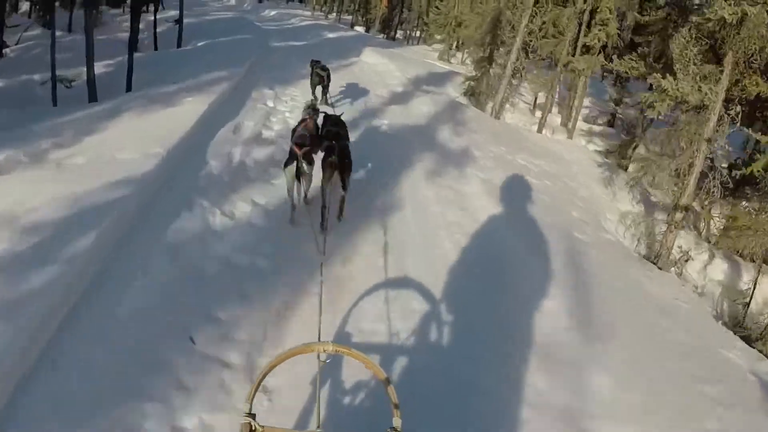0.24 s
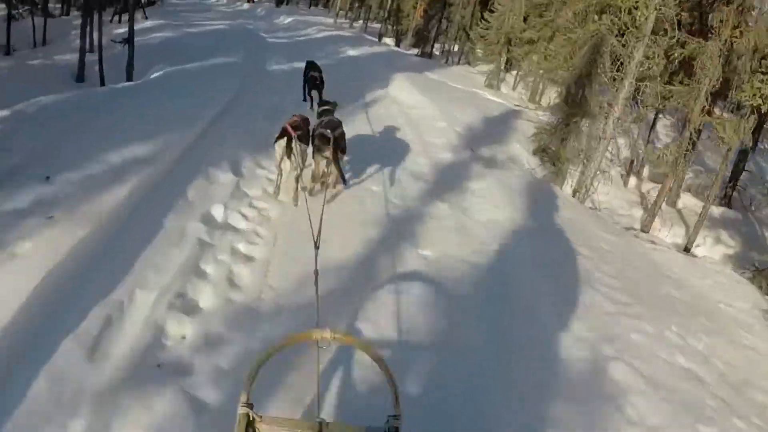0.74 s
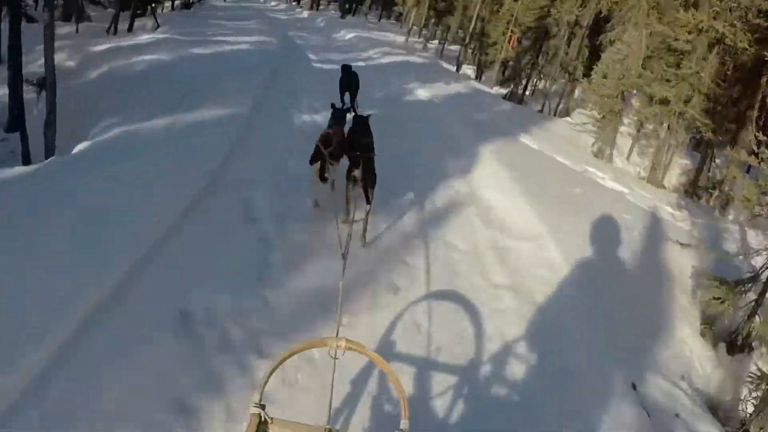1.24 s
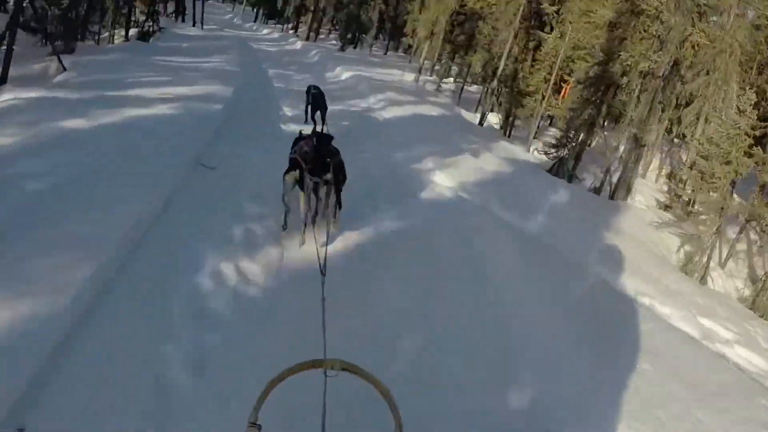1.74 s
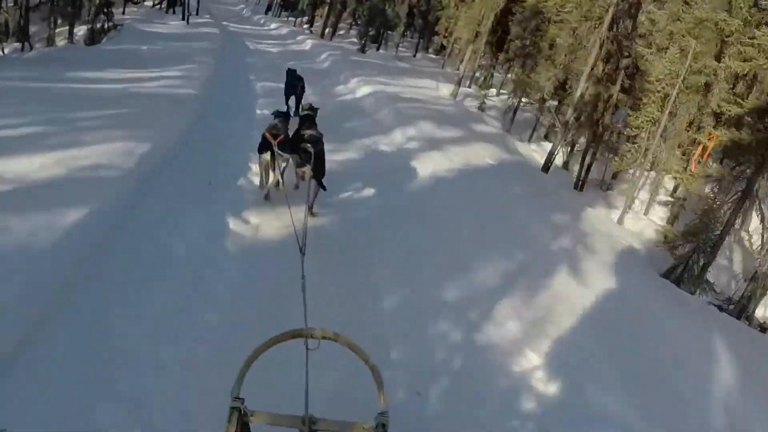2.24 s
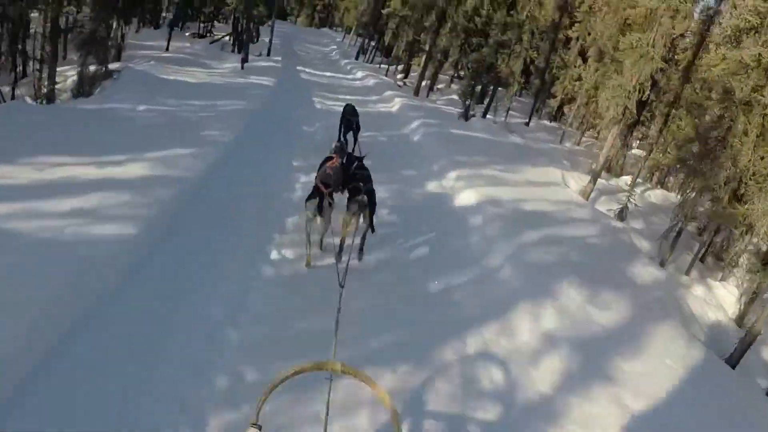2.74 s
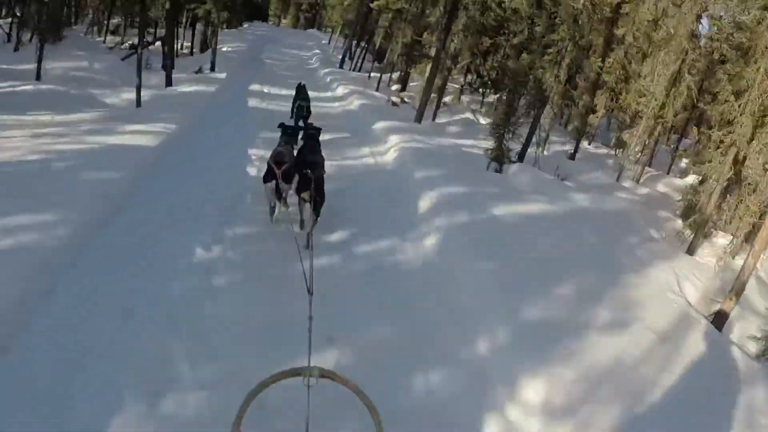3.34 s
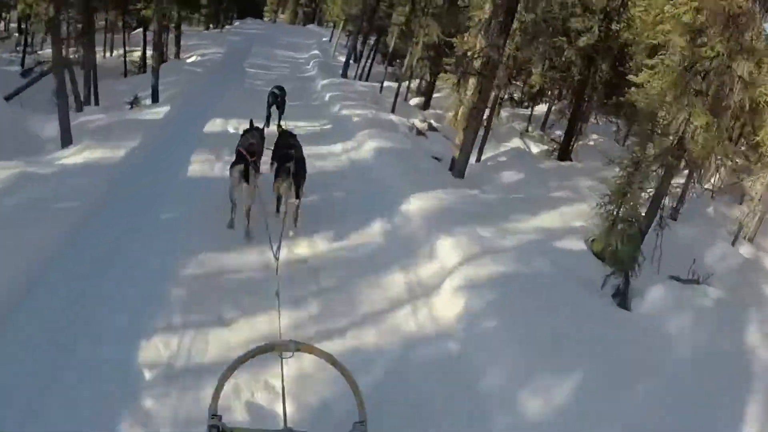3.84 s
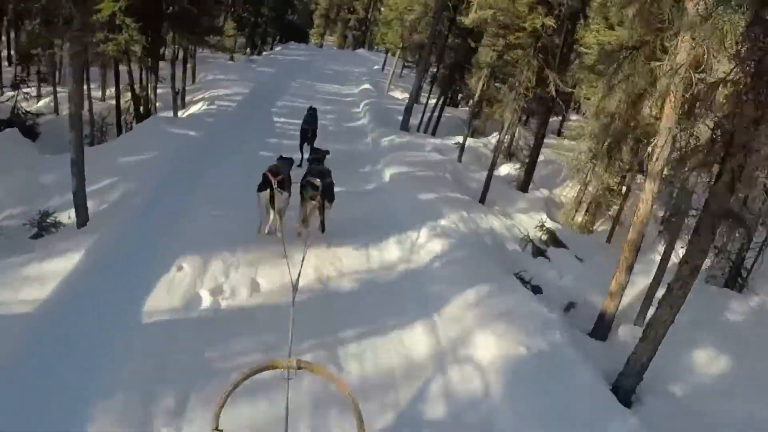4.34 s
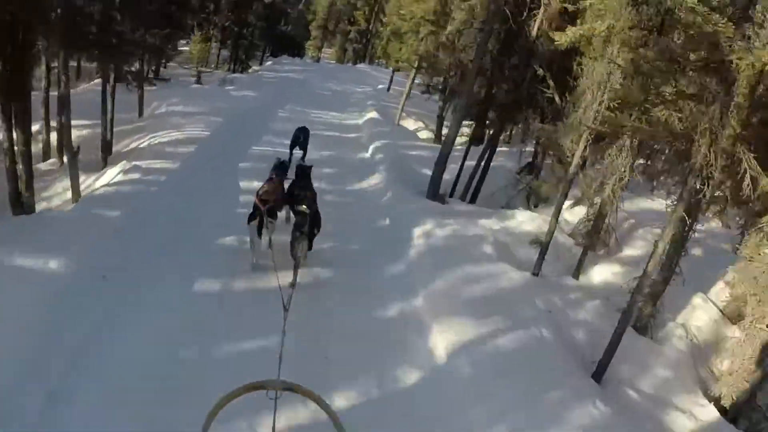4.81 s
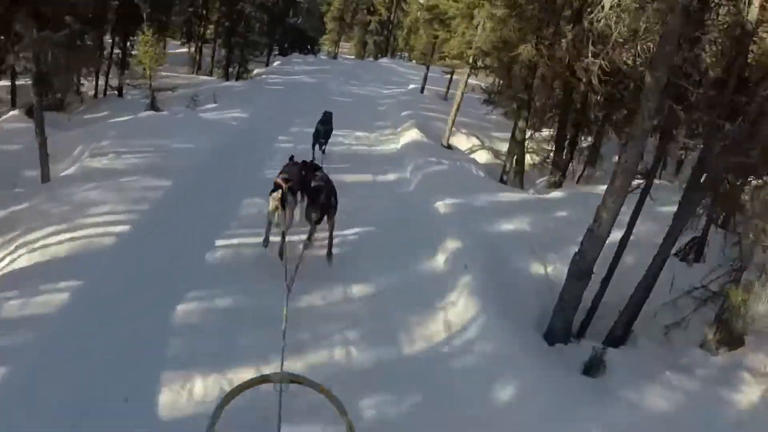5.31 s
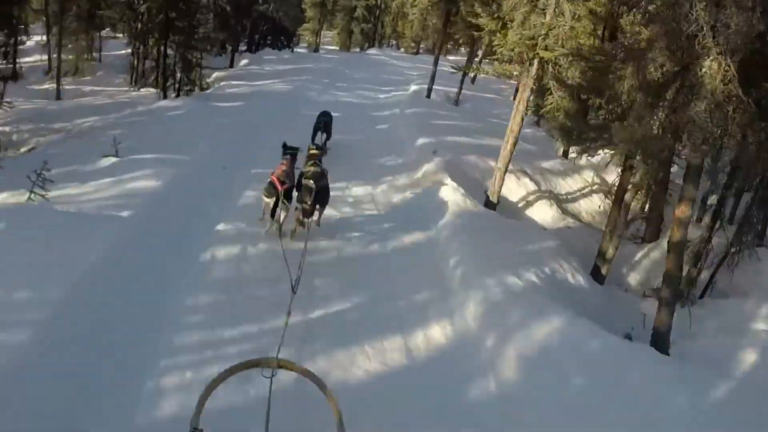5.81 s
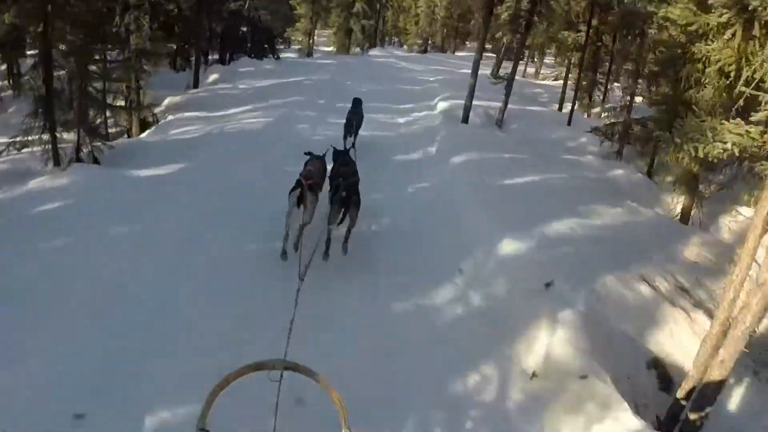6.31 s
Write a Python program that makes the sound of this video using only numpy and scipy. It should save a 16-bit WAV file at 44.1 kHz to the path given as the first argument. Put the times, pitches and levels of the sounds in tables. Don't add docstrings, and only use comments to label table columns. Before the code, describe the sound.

A small camera mounted on a dog sled hears the ride close and dry, outdoors, with a hollow boxy colour. Throughout, runners shear snow in a continuous grainy hiss with finer spray above, and the wooden frame drones and judders underneath. Wind begins fairly calm, rises by 0.35 s into low thumps and lumpy roar, lulls abruptly near 2.3 s, and gusts hardest around 2.6 s. Early on, a wooden knock at 0.3 s and scattered crunches, ticks and faint harness clinks appear. From 2.4 to 3.5 s, knocks, short squeaks and crust cracks thicken. After 4.1 s crunches get sharper and bumps more frequent; around 4.8 s the snow rush peaks with a bright crack. From 5.0 to 5.6 s wooden knocks and dry taps rattle densely amid fresh wind, then ease, with more knocks and crunches near 6.0 to 6.4 s before ending mid-glide at about 6.6 s.

```python
import sys
import numpy as np
from scipy import signal
from scipy.fft import rfft, irfft, next_fast_len
from scipy.io import wavfile
from scipy.ndimage import uniform_filter1d

SR = 44100
rng = np.random.default_rng(int(sys.argv[2]) if len(sys.argv) > 2 else 0)


def generate_wav(sig):
    pcm = np.round(np.clip(np.atleast_2d(sig).T, -1, 1) * 32767).astype(np.int16)
    wavfile.write(sys.argv[1], SR, pcm)


def field_ratio(decibels):
    return 10 ** (np.asarray(decibels, dtype=float) / 20)


N = 289737

# [t/s, level/dB, bumpiness/dB]
GLIDE = [(0.0, -59, -3), (0.27, -55, 1.5), (0.46, -58.5, 0), (1.04, -58.5, -0.5), (1.43, -56.5, 0),
         (1.87, -56, -1.5), (2.4, -56, -3), (2.67, -54.5, -0.5), (3.09, -55, -0.5), (3.4, -56.5, -3.5),
         (3.58, -57, 1), (3.82, -58, -1.5), (4.79, -53.5, 1.5), (5.86, -56, 0.5), (6.22, -55, 1),
         (6.57, -55.5, 4.5)]
# [f/Hz, level/dB]
HISS = [(700, -7), (900, -3), (1200, 2.5), (1700, 3.5), (2600, 4.5), (4000, 0), (5500, -4), (8000, -39)]
# [f/Hz, level/dB]
SPRAY = [(3500, -19), (4800, -6), (6000, -0.5), (7600, -0.5), (9500, -6.5), (10500, -9.5), (12000, -15),
         (15000, -41)]
# [f/Hz, level/dB]
FRAME = [(180, -22), (260, -3), (370, -3.5), (450, -1), (600, -1), (700, -5), (850, -10), (1200, -20.5)]
# [t/s, rise level/dB, length/s]
DRAGS = [(.28, -2.5, .1), (.7, 2.5, .06), (1.0, 0, 0.11), (1.28, 4.5, 0.049), (1.56, 0.5, .05),
         (2.04, -3, .06), (2.24, 4.5, 0.05), (2.45, 5, 0.091), (2.78, 4, 0.045), (3.34, 7, 0.11),
         (3.6, -0.5, 0.12), (3.88, 1.5, 0.03), (4.3, 1, 0.23), (4.79, -16, 0.046), (4.86, 4, 0.073),
         (5.17, 3.5, 0.14), (5.37, 1, 0.21), (5.56, 3.5, 0.19), (5.96, 2, 0.062), (6.25, 1.5, 0.13)]
# [t/s, peak level/dB, length/s]
PAWS = [(.285, -50, .03), (.627, -40.5, 0.029), (.93, -50.5, 0.072), (1.165, -43.5, 0.017),
        (1.4053, -50.5, 0.057), (1.585, -47, 0.081), (1.9235, -45, 0.033), (2.149, -47, 0.081),
        (2.758, -45.5, 0.13), (2.93, -45.5, 0.029), (3.023, -47, 0.053), (3.245, -45, 0.025),
        (3.472, -41.5, 0.046), (3.533, -40.5, 0.025), (3.7584, -44, 0.013), (3.898, -46, 0.058),
        (4.28, -45.5, 0.037), (4.5341, -42, 0.0091), (4.612, -42, 0.015), (4.7821, -59, .038),
        (4.814, -38.5, 0.014), (4.834, -40.5, 0.017), (5.0186, -39, 0.0089), (5.168, -42.5, 0.018),
        (5.348, -43, 0.013), (5.515, -39, 0.016), (5.8325, -49, 0.077), (5.976, -43, 0.044),
        (6.03, -43, 0.036), (6.182, -45.5, 0.037), (6.4, -45.5, 0.024)]
# [t/s, peak level/dB, length/s]
LUMPS = [(.5916, -50, 0.022), (.905, -41, 0.026), (1.306, -41.5, 0.078), (1.5584, -43, 0.057),
         (1.843, -40.5, 0.0089), (1.956, -45, 0.028), (2.34, -51, 0.091), (2.432, -42, 0.023),
         (2.461, -44, 0.12), (2.56, -41, 0.048), (2.6689, -38.5, 0.039), (3.298, -59, .022),
         (3.363, -44, 0.039), (3.405, -47, 0.028), (3.862, -45.5, 0.076), (4.193, -38.5, 0.031),
         (4.4274, -46, 0.03), (4.723, -49, 0.02), (4.866, -41, 0.02), (5.1096, -37.5, 0.021),
         (5.294, -44.5, 0.067), (5.435, -42.5, 0.018), (5.53, -47, .02), (5.761, -41, 0.054),
         (6.16, -39.5, 0.034), (6.2403, -40, 0.042), (6.326, -41.5, 0.059), (6.362, -44, 0.018),
         (6.556, -43, .03)]
# [f/Hz, level/dB]
COARSE = [(600, -12), (1200, -1), (2000, 3), (3200, 0), (5000, -18), (9000, -58)]
# [f/Hz, level/dB]
SPLINTERS = [(2200, -19), (3500, -6), (5000, -7), (7000, -11), (10000, -19), (11500, -27), (14500, -35)]
# [t/s, peak level/dB, f/Hz, length/s]
SQUEAKS = [(0.282, -50, 1590, 0.012), (0.628, -48, 4300, 0.022), (0.629, -60, 3600, 0.017),
           (2.434, -42, 1810, 0.014), (2.435, -49, 1980, 0.01), (2.675, -50.5, 3540, 0.057),
           (3.352, -41.5, 1900, 0.024), (3.358, -53, 2060, .025), (4.533, -40, 3640, 0.0083),
           (4.534, -46, 4800, 0.011), (4.864, -45, 1460, 0.015), (5.119, -48, 2330, 0.0084),
           (5.512, -48, 1470, 0.026), (5.756, -47, 2060, 0.013), (5.974, -45, 2300, 0.0093),
           (6.552, -49, 2400, 0.0098)]
# [t/s, peak level/dB, f/Hz]
TICKS = [(0.0376, -40, 2320), (0.413, -41, 2430), (0.506, -50, 2310), (0.696, -61, 1540),
         (0.7876, -44, 2700), (1.2905, -41, 2320), (2.587, -41, 1960), (3.3448, -43, 1890),
         (3.4725, -39, 3130), (4.2082, -38, 1540), (4.3854, -52, 3540), (4.6054, -38, 2340),
         (4.663, -56, 1750), (4.7255, -42, 1610), (4.7945, -52, 2350), (4.9631, -45, 1500),
         (5.1166, -34, 2320), (5.3512, -54, 2380), (5.5014, -45, 1520), (5.565, -52, 2300),
         (6.3344, -40, 2320), (6.4194, -44, 5010), (6.4587, -40, 5000)]
# [t/s, peak level/dB, f/Hz]
CRACKLE = [(0.1037, -36.5, 2370), (0.2877, -47, 1550), (0.6305, -40, 4320), (0.9108, -40, 2300),
           (1.5928, -36, 3130), (1.9255, -42, 1540), (1.9604, -38, 2400), (2.3371, -42, 2290),
           (2.4324, -35, 1750), (2.4653, -45, 1790), (2.5604, -34, 2930), (2.6688, -45, 3540),
           (2.7894, -43, 2350), (3.0284, -41, 1620), (3.2454, -38, 3540), (3.2969, -36, 2280),
           (3.3623, -39, 1870), (3.5394, -46, 3590), (4.4094, -37, 2310), (4.8155, -31.5, 2340),
           (5.3148, -41, 3170), (5.442, -43, 1520), (5.5199, -44, 1500), (5.6164, -41, 2320),
           (5.8292, -40, 2350), (5.9748, -35, 2360), (6.0494, -37, 3460), (6.2402, -48, 1560),
           (6.317, -44, 2300), (6.3664, -36, 2870)]
# [t/s, peak level/dB, f/Hz]
THUDS = [(0.634, -50, 221), (0.668, -50, 275), (1.168, -45, 221), (1.271, -44, 307), (1.368, -48, 277),
         (1.724, -54, 304), (2.439, -48, 256), (2.64, -53, 285), (2.927, -53, 334), (3.24, -51, 221),
         (3.297, -44.5, 336), (3.37, -43, 221), (4.185, -47, 223), (4.542, -46.5, 326), (4.731, -51, 221),
         (4.881, -51, 304), (5.092, -46, 256), (5.238, -42, 234), (5.469, -44, 221), (5.714, -44, 222),
         (5.942, -47, 406), (6.496, -50, 288)]
# [t/s, peak level/dB, f/Hz]
TAPS = [(4.699, -43, 511), (4.744, -47, 641), (5.02, -45, 468), (5.081, -44, 560), (5.131, -46, 646),
        (5.21, -45, 576), (5.239, -42, 544), (5.336, -46, 439), (5.392, -42, 635), (5.438, -47, 401),
        (5.474, -50, 619), (5.508, -47, 603), (5.544, -48, 401), (5.571, -44, 401), (5.59, -44, 474),
        (5.609, -44, 441), (5.67, -50, 554)]
# [t/s, peak level/dB, f/Hz]
KNOCKS = [(.274, -38.5, 580), (.304, -43, 580), (1.274, -45, 614), (2.102, -42, 535), (2.231, -41, 525),
          (2.411, -41.5, 556), (2.378, -45, 603), (2.514, -36, 610), (3.299, -45, 570), (3.361, -42, 526),
          (4.133, -39, 540), (4.226, -39, 617), (4.289, -42, 543), (4.327, -40, 520), (4.461, -40, 500),
          (4.697, -42, 442), (4.733, -38, 340), (4.889, -37.5, 590), (5.02, -43, 480), (5.088, -37, 543),
          (5.131, -43, 650), (5.163, -36, 450), (5.209, -41, 507), (5.238, -35.5, 557), (5.265, -39, 560),
          (5.288, -33, 584), (5.303, -34.5, 570), (5.352, -37.5, 600), (5.411, -34.5, 603),
          (5.439, -33, 387), (5.484, -46, 600), (5.508, -41, 610), (5.533, -33, 610), (5.572, -52, 560),
          (5.589, -46, 523), (6.05, -36.5, 580), (6.16, -40, 546), (6.233, -42, 637), (6.272, -37, 594),
          (6.335, -39, 656), (1.555, -41.5, 560), (2.775, -44, 555), (3.495, -49, 530), (4.165, -46, 554),
          (4.495, -41, 550), (5.996, -40, 547)]
# [f/Hz, level/dB]
SCUFF = [(600, -30), (800, -24), (1100, -25), (1600, 13), (2500, -9)]
# [t/s, lowest mode's peak level/dB, extra upper mode level/dB]
CLINKS = [(.7932, -72, 11), (0.813, -61, -10), (.9602, -67, 10), (1.0176, -72, -1), (1.136, -69, -2),
          (1.1654, -69, 8), (1.2446, -79, 17), (1.4994, -73, 11), (1.7924, -69, 7), (2.154, -66, -1),
          (2.91, -66, 4.5), (2.948, -63, 0), (3.2394, -70, -7), (3.3687, -70, -4), (4.912, -65, 4)]
# [f/Hz, time to fall 60 dB/s]
SNAP_MODES = [(6090, 0.2), (7755, 0.26), (9210, 0.16), (9980, 0.13)]
UPPER_MODES = [-12, -17, -15]
# [t/s, level/dB]
WIND = [
    (0.0, -45.5),
    (0.35, -36.5),
    (0.69, -37.5),
    (1.48, -37.5),
    (1.76, -35.5),
    (2.3, -45.5),
    (2.61, -35),
    (3.68, -39),
    (5.25, -36),
    (6.57, -39.5),
]
# [t/s, rise level/dB, length/s]
EDDIES = [(0.103, 8, 0.04), (.43, 2, 0.1), (0.723, -1, .1), (0.976, 3.5, 0.14), (1.205, 9, 0.035),
          (1.427, 7, 0.11), (1.61, 8.5, 0.033), (1.98, 8.5, 0.064), (2.188, 9.5, 0.06), (2.338, 11, 0.11),
          (2.46, 12, 0.036), (2.61, 7.5, 0.17), (2.77, 9.5, 0.12), (3.1, 3.5, 0.12), (3.312, 9.5, 0.15),
          (3.655, 6.5, 0.12), (3.865, 4.5, 0.065), (4.228, 11.5, 0.035), (4.438, 8, 0.029),
          (4.588, 15, 0.054), (4.725, 4.5, 0.024), (4.842, 12, 0.027), (4.91, 11.5, 0.07), (5.17, 2.5, 0.2),
          (5.352, -1.5, 0.088), (5.54, 9, 0.083), (5.795, 2, 0.14), (6.03, 10, 0.1), (6.41, 2.5, 0.085),
          (6.563, 11, 0.031)]
# [t/s, rise level/dB, length/s]
SURGES = [(.27, -10, 0.085), (.6, -3, 0.09), (.86, -6, 0.14), (.99, 6, 0.091), (1.11, -13, 0.17),
          (1.24, 2, .12), (1.6, 4.5, 0.081), (1.97, 1, 0.084), (2.24, 6.5, .06), (2.48, 7, 0.089),
          (2.6, 1, 0.09), (2.77, 1, 0.11), (3.13, -5, 0.084), (3.35, 3.5, 0.24), (3.5, 7.5, 0.12),
          (3.6, -11, 0.17), (4.01, 6.5, 0.087), (4.2, -9, 0.069), (4.44, 7, 0.16), (4.8, 7, .07),
          (4.9, 7, 0.15), (5.19, 8.5, 0.27), (5.36, 8.5, 0.07), (5.53, 2, .08), (5.67, -11, 0.069),
          (5.95, 1, .08), (6.1, 4.5, 0.11), (6.27, 7.5, 0.15), (6.49, 10.5, 0.24)]
# [t/s, rise level/dB, length/s]
PUFFS = [(0.14, -3.5, 0.13), (0.38, 1.5, 0.26), (0.95, -2.5, 0.12), (1.09, 0, 0.07), (1.33, -3.5, 0.2),
         (1.5, -9, 0.06), (1.6, 2.5, 0.09), (2.06, -0.5, 0.16), (2.24, 6, 0.098), (2.46, 2.5, 0.071),
         (3.12, 2.5, 0.27), (3.22, -12, 0.096), (3.32, 4.5, 0.36), (3.79, -1.5, 0.27), (3.88, 2.5, 0.061),
         (4.04, 3, 0.061), (4.19, 4.5, 0.092), (4.32, 3.5, 0.096), (4.7, 3, 0.08), (4.88, 4, 0.22),
         (5.39, 3.5, 0.3), (5.65, -4.5, 0.1), (5.71, 4, 0.14), (6.05, -1.5, 0.34), (6.35, 6, 0.045),
         (6.45, 1, 0.055)]
# [f/Hz, level/dB]
BUFFET = [(4.7, -4.5), (8.0, 4), (31, 1.5), (46, -7.5), (60, -23), (80, -80), (150, -120)]
# [f/Hz, level/dB]
THRUM = [(30, -46), (48, 2), (62, -2), (85, -10.5), (105, -12), (140, -48)]
# [f/Hz, level/dB]
ROAR = [(70, -28), (100, -9.5), (125, -10.5), (162, -15.5), (330, -28), (430, -85), (730, -120)]
# [f/Hz, width/Hz, level/dB]
HOUSING = [(1545, 70, 3.2), (2345, 95, 6), (2600, 500, -3.5), (3540, 130, 3.3), (4260, 580, 0.5),
           (5045, 170, 4.5), (5700, 200, -1), (6500, 690, 3.5), (6884, 560, -8), (8100, 120, -1.5),
           (8700, 930, -6.5), (9120, 360, 5.5), (11030, 980, -6)]
# [f/Hz, level/dB]
SELF_NOISE = [(3000, -16), (9000, -5.5), (12800, -3), (13300, 0), (14000, -3), (14900, -2), (15250, -14)]
# [t/s, rise of the bar level/dB, length/s]
THIN_MOMENTS = [(.02, 6, .02), (.56, 4, .04), (.99, 8, .03), (1.48, 5, .05), (1.97, 10, .03),
                (2.36, 2.5, .04), (2.48, 7, .03), (2.83, 5, .03), (3.66, 11, .04), (4.22, 6, .03),
                (4.88, 3.5, .05), (5.3, 2.5, .04), (6.05, 3, .03), (6.3, 4, .03)]


def runners():
    hiss_db, bumps_db = columns(GLIDE)
    spray_db = -10 + 1.26 * drift(0.025)
    frame_db = -61 + bumps_db + swells(DRAGS) + judder() + 1.2 * drift(0.027)
    trail = drift(0.0034)
    hiss = evened(coloured(grit(N, 2.7), spectrum(HISS)) * field_ratio(1.3 * trail + 0.6 * drift(0.03)))
    spray = evened(coloured(grit(N, 1.0), spectrum(SPRAY)) * field_ratio(0.55 * trail + 0.23 * drift(0.011)))
    frame = evened(coloured(grit(N, 2.8), spectrum(FRAME)) * field_ratio(1.1 * trail + 1.1 * drift(0.0079)))
    snow = reshaped(hiss + field_ratio(spray_db) * spray, 256, patches)
    return field_ratio(hiss_db) * snow + field_ratio(frame_db) * frame


def judder():
    turns = np.cumsum(34 * (1 + 0.2075 * drift(0.053))) / SR
    return 0.79 * swells(DRAGS) * np.cos(2 * np.pi * turns)


def patches(hz, z, patchy_db=0.6):
    spots = uniform_filter1d(rng.standard_normal(z.shape), 4, axis=0)
    return field_ratio(patchy_db * evened(uniform_filter1d(spots, 12, axis=1)))


def crunches(breaks, splinters_db):
    out, t = np.zeros(N), np.arange(6000) / SR
    for s, db, length in breaks:
        unsteady = evened(uniform_filter1d(rng.standard_normal(len(t)), size=130))
        fractures = grit(len(t), 3.2) * field_ratio(2 * unsteady)
        uneven = reshaped(fractures, 256, lambda hz, z: patches(hz, z, patchy_db=2.5))
        lumps = evened(coloured(uneven, spectrum(COARSE)))
        splinters = evened(coloured(uneven, spectrum(SPLINTERS)))
        crunch = lumps + field_ratio(splinters_db + 8.5) * splinters
        add(out, s - 0.002, field_ratio(db - 14.5) * crush(t, length, tail=0.075) * crunch)
    return out


def crush(t, length, tail):
    fall_db = 60 * np.maximum(t - length, 0) / tail + 5.14 * t / length
    return np.clip(t / 0.0058, 0, 1) * field_ratio(-fall_db)


def squeaks():
    out, t = np.zeros(N), np.arange(4000) / SR
    for s, db, centre_hz, length in SQUEAKS:
        squeak = evened(coloured(grit(len(t), 3), resonance(centre_hz, 0.13)))
        add(out, s, field_ratio(db - 4.5) * crush(t, length, tail=0.05) * squeak)
    return out


def ticks(cracks, t60, rise_s):
    out, t = np.zeros(N), np.arange(1500) / SR
    for s, db, centre_hz in cracks:
        crack = evened(coloured(grit(len(t), 3.8), resonance(centre_hz, 0.3)))
        add(out, s, field_ratio(db - 13.5 - 60 * t / t60) * np.clip(t / rise_s, 0, 1) * crack)
    return out


def knocks():
    out, t = np.zeros(N), np.arange(3000) / SR
    for s, db, hz in KNOCKS:
        jolt = grit(len(t), 2.7)
        wood = evened(coloured(jolt, spectrum(FRAME)))
        scuff = evened(coloured(jolt, spectrum(SCUFF)))
        thud = (wood + 0.33 * scuff) * field_ratio(-60 * t / 0.025)
        ring = np.sin(2 * np.pi * hz * t) * field_ratio(-60 * t / 0.04)
        add(out, s, field_ratio(db + 1.5) * np.clip(t / 0.0043, 0, 1) * (0.48 * ring + 0.55 * thud))
    return out


def rattle():
    out, t = np.zeros(N), np.arange(2000) / SR
    hits = field_ratio(2.8 * rng.standard_normal(N)) * (rng.random(N) < 50 / SR)
    slat = rng.integers(0, 8, N)
    for k, hz in enumerate(np.geomspace(350, 660, 8)):
        ring = np.sin(2 * np.pi * hz * t) * field_ratio(-60 * t / 0.048) * np.clip(t / 0.00086, 0, 1)
        out += signal.oaconvolve(hits * (slat == k), ring)[:N]
    bumps_db = columns(GLIDE)[1]
    return field_ratio(-80 + 1.5 * (bumps_db + swells(DRAGS))) * out


def clinks():
    out, t = np.zeros(N), np.arange(6000) / SR
    for s, db, upper_db in CLINKS:
        wobble, chatter = evened(uniform_filter1d(rng.standard_normal((2, len(t))), size=150))
        modes_db = [0, *(upper_db + np.array(UPPER_MODES))]
        for (hz, t60), mode_db in zip(SNAP_MODES, modes_db):
            ring = np.sin(2 * np.pi * hz * t + 0.55 * wobble) * field_ratio(2.5 * chatter)
            add(out, s, field_ratio(db + mode_db + 7.5 - 60 * t / t60) * np.clip(t / 0.0038, 0, 1) * ring)
    return out


def wind():
    stream_db, bumps_db, eddy_db = columns(WIND)[0], columns(GLIDE)[1], swells(EDDIES)
    buffet = steadied(coloured(rng.standard_normal(N), spectrum(BUFFET)), size=3500)
    thrum = steadied(coloured(rng.standard_normal(N), spectrum(THRUM)), size=2500)
    roar = steadied(coloured(rng.standard_normal(N), spectrum(ROAR)), size=1800)
    buffet_db = stream_db + eddy_db - drift(0.0123)
    thrum_db = -50 + swells(SURGES)
    roar_db = -57.5 + swells(PUFFS) + 0.062 * eddy_db + 0.26 * bumps_db + 2.2 * drift(0.0094)
    push = field_ratio(-31) * np.exp(-np.arange(N) / SR / 0.0084)
    return field_ratio(buffet_db) * buffet + field_ratio(thrum_db) * thrum + field_ratio(roar_db) * roar + push


def steadied(x, size):
    return evened(x / np.sqrt(uniform_filter1d(evened(x) ** 2, size) + 0.095))


def housing(hz):
    return sum(db / (1 + (2 * (hz - f) / width) ** 2) for f, width, db in HOUSING)


def shifting(hz, z):
    rings = [(f, width) for f, width, db in HOUSING if db > 3]
    wander = evened(uniform_filter1d(rng.standard_normal((len(rings), z.shape[1])), size=8))
    return field_ratio(sum(2.2 * w / (1 + ((hz - f) / min(width, 150)) ** 2) for (f, width), w in zip(rings, wander)))


def thinned(hz, z):
    power = np.mean(abs(z) ** 2, axis=1, keepdims=True)
    usual = np.sqrt(uniform_filter1d(power, size=15, axis=0))
    wander = evened(uniform_filter1d(rng.standard_normal(z.shape[1]), size=4))
    moments_db = np.interp(np.arange(z.shape[1]) * 512, np.arange(N), swells(THIN_MOMENTS))
    harder_db = 4 * np.clip((hz - 14500) / 600, 0, 2) ** 2
    easier_db = 9 * np.clip((13300 - hz) / 900, 0, 9) ** 2
    bar_db = 2.6 + wander + moments_db + harder_db - easier_db
    return np.where(abs(z) > usual * field_ratio(bar_db), 1, field_ratio(-45))


def evened(x):
    return x / np.sqrt(np.mean(x ** 2) + 1e-20)


def columns(rows):
    s, *values = np.transpose(rows)
    return [np.interp(np.arange(N) / SR, s, v) for v in values]


def swells(rows):
    t = np.arange(0, N, 64) / SR
    humps = np.zeros(len(t))
    for s, db, length in rows:
        humps += db * np.cos(np.pi * np.clip((t - s) / (2 * length), -0.5, 0.5)) ** 2
    return np.interp(np.arange(N) / SR, t, humps)


def drift(seconds):
    size = max(round(seconds * SR), 1)
    return evened(uniform_filter1d(uniform_filter1d(rng.standard_normal(N), size), size))


def grit(count, spread_db):
    return evened(rng.standard_normal(count) * field_ratio(spread_db * np.minimum(rng.exponential(1, count), 5)))


def add(mix, s, sound):
    part = mix[round(s * SR):][:len(sound)]
    part += sound[:len(part)]


def spectrum(points):
    f, db = np.transpose(points)
    return lambda hz: np.interp(np.log(hz + 1), np.log(f + 1), db, -90, -90)


def resonance(centre_hz, width):
    return lambda hz: -20 * np.log10(1 + ((hz - centre_hz) / (width * centre_hz)) ** 2)


def coloured(x, db_of_hz):
    size = next_fast_len(len(x))
    return irfft(rfft(x, size) * field_ratio(db_of_hz(np.fft.rfftfreq(size, 1 / SR))), size)[:len(x)]


def rung(x, db_of_hz):
    log_gain = np.log(field_ratio(db_of_hz(abs(np.fft.fftfreq(8192, 1 / SR)))))
    ringing = np.fft.ifft(np.exp(np.conj(signal.hilbert(log_gain)))).real[:4096]
    return signal.oaconvolve(x, ringing)[:len(x)]


def reshaped(x, size, gain_of_cells):
    overlap = 3 * size // 4
    hz, _, z = signal.stft(x, SR, nperseg=size, noverlap=overlap)
    return signal.istft(z * gain_of_cells(hz[:, None], z), SR, nperseg=size, noverlap=overlap)[1][:len(x)]


def scene():
    crust = crunches(PAWS, splinters_db=-4.5) + crunches(LUMPS, splinters_db=-10.5)
    cracks = ticks(TICKS, 0.081, 0.0013) + ticks(CRACKLE, 0.078, 0.0016)
    jolts = field_ratio(9) * ticks(THUDS, 0.08, 0.0035) + field_ratio(3) * ticks(TAPS, 0.045, 0.002)
    sled = runners() + crust + squeaks() + cracks + jolts + knocks() + rattle() + clinks()
    return (reshaped(rung(sled, housing), 1024, shifting) + wind())[None]


def band_limit(x):
    return signal.sosfilt(signal.butter(12, 15140, fs=SR, output="sos"), x)


def record(dry):
    hiss = field_ratio(-77) * evened(coloured(rng.standard_normal(N), spectrum(SELF_NOISE)))
    mix = reshaped(dry[0] + hiss, 2048, thinned)[None]
    return band_limit(mix)


dry = scene()
out = record(dry)
generate_wav(out)
```